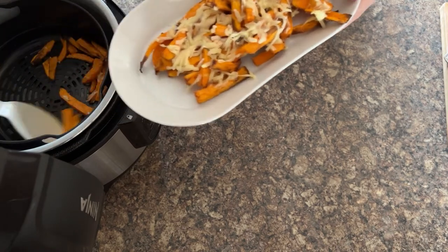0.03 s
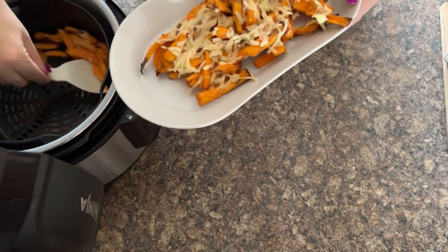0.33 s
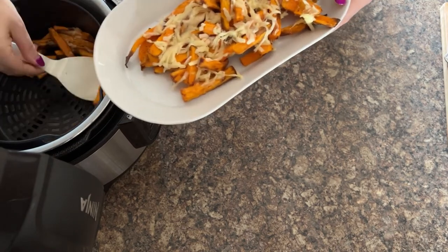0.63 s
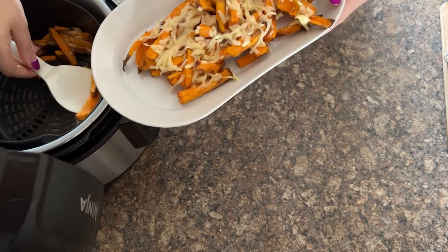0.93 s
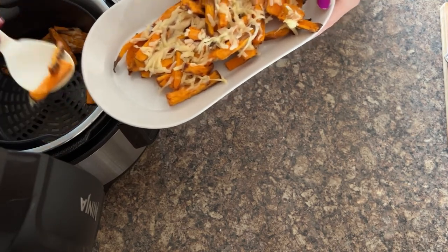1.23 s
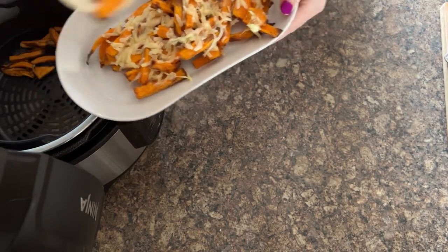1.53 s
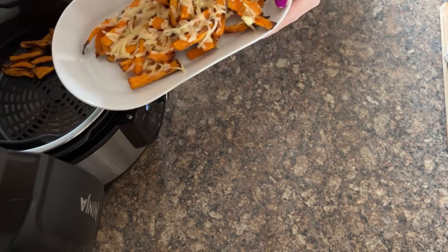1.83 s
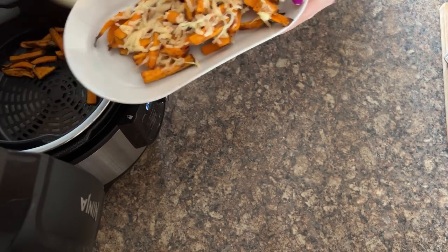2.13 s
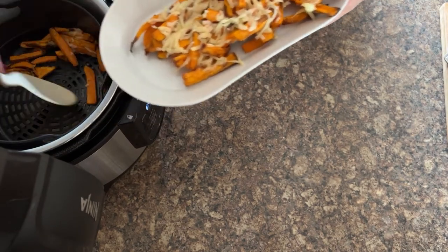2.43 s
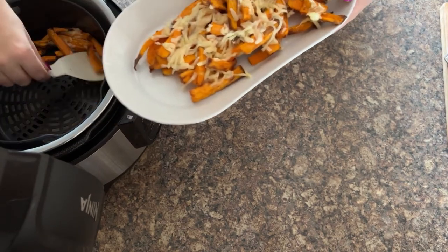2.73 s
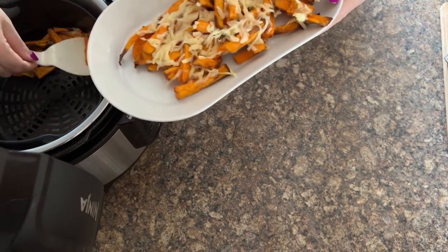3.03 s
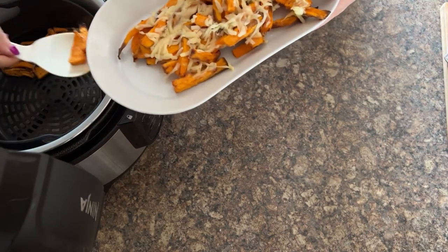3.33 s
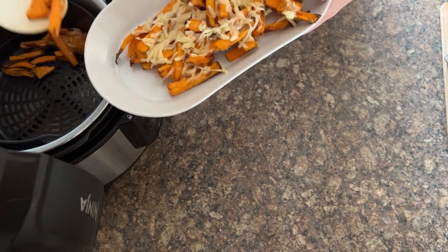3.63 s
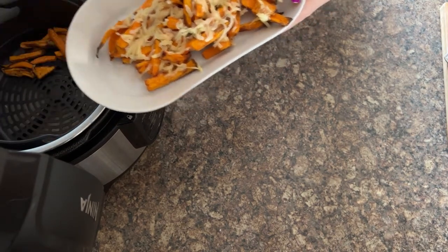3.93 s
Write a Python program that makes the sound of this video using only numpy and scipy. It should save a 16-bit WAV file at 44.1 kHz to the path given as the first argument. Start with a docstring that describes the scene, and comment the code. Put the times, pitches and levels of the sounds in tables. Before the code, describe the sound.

Plastic spoon scraping an air fryer's grate twice, with hollow bumps and fries dropping softly between.

```python
"""A plastic spoon scoops fries out of an air fryer basket in two strokes, up close in a small kitchen.
Its edge sticks and slips over the grate, catches on the slots and knocks the metal wall, while the
loose grate rocks with hollow bumps. Oily fries crackle and, between the strokes, drop softly on a
dish, which taps the fryer's rim once. An appliance hums and whirs underneath."""
import sys
import numpy as np
from scipy import signal
from scipy.fft import rfft, irfft
from scipy.io import wavfile
from scipy.ndimage import uniform_filter1d

SR = 44100
rng = np.random.default_rng(int(sys.argv[2]) if len(sys.argv) > 2 else 0)


def int16_out(signal):
    """Quantize to a 16-bit WAV file."""
    q = np.round(np.clip(np.atleast_2d(signal).T, -1, 1) * 32767)
    wavfile.write(sys.argv[1], SR, q.astype(np.int16))


N = 176400

# Stereo width of noise, side against mid: freq_hz, side_db
STEREO_WIDTH = [(40, -19), (150, -9.5), (400, -8.5), (1000, -3), (3000, -7.5), (8000, -3.5), (16000, 4.5)]
# Room tone: freq_hz, gain_db
AIR_EQ = [(22, -17), (32, -23), (45, -0.5), (78, 2.5), (120, -10), (200, -15), (260, -17.5), (400, -20),
          (630, -27), (1000, -34), (2000, -34.5), (3200, -47.5), (13000, -44.5), (16000, -57)]
# Mains hum of the appliance: pitch_hz, rms_db
HUM_PARTIALS = [(49.7, -58), (99.6, -65), (199.4, -77.5)]
# Colour of the kitchen reverb: freq_hz, gain_db
REVERB_EQ = [(60, -13.5), (300, -9), (1000, -6), (3000, -12), (8000, -10), (16000, -34)]
# Ceramic ring of the dish: pitch_hz, gain_db, t60_s
DISH_MODES = [(592.5, -7, .5), (824, -10, 0.45), (1040, -10, 0.27), (1200, -2.5, 0.087), (1310, -7, 0.44),
              (2120, -12.5, 0.23)]
# Dull tap of the dish on the rim: freq_hz, gain_db
DISH_TAP_EQ = [(200, -22), (600, -3.5), (1400, -5.5), (2500, -11.5), (5000, -10)]
# Oily fries crackle as they are lifted and tipped: time_s, level_db
CRACKLE_ENVELOPE = [(0, -86), (.7, -86), (1.0, -73), (1.35, -91.5), (1.7, -77), (2.05, -80.5), (2.3, -99),
                    (4, -99)]
# Colour of the crackle: freq_hz, gain_db
CRACKLE_EQ = [(500, -14), (2000, -2), (5000, -3.5), (9000, -6), (12000, -6), (16000, -7.5)]
# Fries drop, shift and tick: start_s, level_db, centre_hz, spread_octaves, rise_s
FRY_PATS = [(1.528, -76, 2390, 1.1, 0.00045), (1.563, -70.5, 1630, 1.05, .0005),
            (1.634, -76, 3160, 0.54, 0.015), (1.662, -70, 2470, 1.1, 0.023),
            (1.704, -56.5, 1850, 1.28, 0.000074), (1.808, -66.5, 2640, 1.03, 0.0029),
            (1.846, -67.5, 3580, .75, 0.0038), (1.924, -69, 2790, 0.73, 0.00046),
            (1.987, -67, 4030, 3, 0.0013), (1.999, -67, 1730, 1.3, 0.0049), (2.1365, -76, 3460, 1.6, .0003),
            (2.25, -75, 3200, 1.6, .0005), (2.351, -74, 2500, 1.2, 0.0053),
            (3.478, -74.5, 4500, 0.48, 0.00034), (3.9073, -74.5, 11200, 0.59, 0.00016)]
# Low modes of the basket in its housing: pitch_hz, gain_db, t60_s
BODY_MODES = [(194.6, -19, 0.12), (271, -8.5, 0.166), (322.7, -2, 0.12), (356, 1, 0.2), (437.4, 1, 0.053),
              (448, -24.5, 0.14), (510, -6.5, 0.065), (584.5, -12.5, 0.11), (625, -9, 0.057)]
# Ring of the grate in the bottom of the basket: pitch_hz, gain_db, t60_s
GRATE_MODES = [(615, -10, 0.074), (907, 1, 0.11), (1247, -13.5, 0.051), (1390, -10, 0.15),
               (1670, -1.5, 0.047), (2068, -1.5, 0.11), (2080, 2.5, 0.15), (2300, -10, 0.088),
               (2955, 1.5, 0.11), (3266, -9.5, 0.094), (3770, -8.5, 0.24), (4464, -3, .06)]
# Ring of the metal wall: pitch_hz, gain_db, t60_s
WALL_MODES = [(1011, -2.5, 0.17), (1050, -23, 0.26), (1520, -9.5, 0.36), (1551, 3, 0.1), (1872, -43, 0.51),
              (2245, -25.5, 0.19), (2499, -0.5, 0.18), (2906, 2, 0.09), (2990, 3.5, 0.17),
              (3476, 1.5, 0.12), (3716, -7, .2), (3775, -5.5, 0.12), (4255, -7.5, .25), (4730, -5.5, 0.13),
              (5650, -25, 0.59), (6360, -10.5, 0.098), (7050, -7, 0.076), (8450, -13, 0.142)]
# Hollow bumps and a rising groan of the grate: start_s, level_db, pitch_hz, glide_hz_per_s, t60_s
GRATE_BUMPS = [(0, -46.5, 336, 0, 0.11), (0.033, -46, 293, 0, 0.042), (.059, -47, 343, 0, 0.071),
               (.108, -45.5, 314.6, 5, 0.32), (0.157, -45, 328, -2, 0.076), (0.192, -48, 358, 0, 0.085),
               (0.239, -51, 375, -7, 0.42), (0.323, -49, 405, 0, 0.059), (0.343, -47, 355, 0, 0.26),
               (.5, -52.5, 308, 0, 0.072), (0.576, -56.5, 338, 3, 0.1), (.626, -42.5, 519, 0, 0.037),
               (.846, -47, 334.5, 1100, 0.17), (2.502, -37.5, 359, 0, 0.079), (2.537, -38, 378.4, -1, 0.33),
               (2.654, -51, 431, 0, 0.081), (2.679, -46.5, 328, 0, 0.062), (2.761, -52, 303, -900, 0.033),
               (2.978, -42, 524, -2, .045), (3.167, -60.5, 348, 4, 0.14)]
# Spoon knocks the basket:
# start_s, clack_db, clack_centre_hz, clack_spread_octaves, clack_t60_s, wall_db, grate_db, thump_db
SPOON_KNOCKS = [(0.6253, -45, 1390, 1.7, 0.062, -46.5, -57, -39),
                (2.5025, -55.5, 1420, 1, 0.055, -74, -52.5, -53),
                (2.9087, -39.5, 1900, 0.46, 0.027, -46, -68.5, -53),
                (2.9777, -36, 1860, 1.54, 0.069, -36, -54.5, -32),
                (2.988, -45.5, 1720, 1.1, 0.048, -50.5, -61.5, -46.5)]
# Spoon edge catches on a slot and slips: start_s, rasp_db, length_s, thump_db
SLOT_CATCHES = [(0.0198, -40.5, 0.0057, -54), (0.078, -55, .006, -62), (0.223, -55.5, 0.0059, -76),
                (0.569, -59, 0.011, -72), (0.6855, -48, 0.0083, -60.5), (0.744, -50, 0.01, -55),
                (2.536, -41.5, 0.017, -49), (2.652, -52, 0.0033, -53.5), (2.7473, -55.5, 0.0021, -58)]
# Envelopes of the two scraping strokes, one list each: time_s, hiss_db, rasp_db, judder_db
STROKE_ENVELOPES = [
    [(0, -48, -49, -48.5), (.06, -60.5, -56.5, -52), (.14, -52.5, -52.5, -52), (.19, -57, -60.5, -57),
     (.25, -49.5, -61.5, -57.5), (.33, -53, -56, -47.5), (.4, -56, -63.5, -56), (.47, -74, -71.5, -72),
     (.51, -102, -63.5, -59), (.6, -70.5, -61, -60.5), (.72, -63, -63.5, -51.5), (.79, -53, -74, -56.5),
     (.85, -67.5, -68.5, -55), (.93, -69.5, -70.5, -63), (1.2, -97, -84.5, -76)],
    [(2.495, -66, -65.5, -70), (2.505, -56, -56, -52.5), (2.57, -57.5, -61, -51.5), (2.62, -70.5, -68, -74),
     (2.64, -56, -57.5, -60.5), (2.67, -52.5, -49.5, -55), (2.69, -64, -70, -55.5),
     (2.725, -78, -90, -69.5), (2.755, -82.5, -58.5, -52), (2.83, -86, -78, -73.5), (2.89, -73, -51.5, -53),
     (2.96, -72, -58, -55.5), (3.19, -84, -77, -63.5), (3.3, -95.5, -87, -72)],
]
# Colours of the friction (bright slip, treble hiss, mid rasp, low judder): freq_hz, gain_db
SLIP_EQ = [(200, -31), (900, -15), (2400, 7.5), (4200, 4.5), (5500, 2.5), (7800, 7.5), (12500, 2.5),
           (15800, -3.5)]
HISS_EQ = [(400, -42), (2000, -7.5), (3500, -1), (5200, -3.5), (7800, 4), (9500, -7), (12000, 2.5),
           (15800, -6.5)]
RASP_EQ = [(200, -1), (580, -0.5), (720, -8), (900, -1), (1300, 7), (2200, 1.5), (3300, -1), (5000, -6),
           (12000, -25.5)]
JUDDER_EQ = [(60, -34.5), (170, -1), (240, -6), (310, -3), (410, 0.5), (520, -26.5), (800, -28.5),
             (4000, -53.5)]

GRAINS_PER_S, GRAIN_T60_S = 4900, 0.0052  # stick-slip of plastic on the grate
TIME = np.arange(N) / SR
SIDE = np.array([[1], [-1]])  # left plus, right minus


def undb(db):
    """Decibels to gain."""
    return 10 ** (np.asarray(db) / 20)


def unit(x):
    """Scale a response to unit energy, averaged over the channels."""
    return x / np.sqrt(np.mean(np.sum(x ** 2, axis=-1)))


def fade(t, t60):
    """Exponential decay, 60 dB down at t60."""
    return np.exp(-np.log(1000) * t / t60)


def envelope(table, column=1):
    """Gain along one dB column of a timed table, silent outside it."""
    rows = np.array(table, float)
    return undb(np.interp(TIME, rows[:, 0], rows[:, column], left=-200, right=-200))


def colour(x, eq):
    """Minimum-phase EQ through (freq_hz, gain_db) points."""
    size = 8192
    hz, db = np.array(eq, float).T
    bin_db = np.interp(np.log(np.fft.rfftfreq(size, 1 / SR) + 1), np.log(hz), db)
    cepstrum = irfft(np.log(undb(bin_db)))
    cepstrum[1:size // 2] *= 2
    cepstrum[size // 2 + 1:] = 0
    impulse = irfft(np.exp(rfft(cepstrum)))
    return signal.fftconvolve(x, impulse[None], axes=-1)[:, :x.shape[-1]]


def bell_eq(centre_hz, octaves, floor_db=-30):
    """EQ points of a bell standing on a flat floor."""
    hz = np.geomspace(20, SR / 2, num=240)
    bell = np.exp(-(np.log2(hz / centre_hz) / octaves) ** 2)
    return np.c_[hz, 20 * np.log10(bell + undb(floor_db))]


def noise(n):
    """Stereo noise, narrow in the bass and wide in the treble."""
    mid, side = rng.standard_normal((2, 1, n))
    hz, side_db = np.array(STEREO_WIDTH, float).T
    total_db = 10 * np.log10(1 + undb(side_db) ** 2)
    return colour(mid, np.c_[hz, -total_db]) + SIDE * colour(side, np.c_[hz, side_db - total_db])


def grains(per_s, scatter_db):
    """Random tiny impulses of uneven size, rms 1."""
    chance, size, sign = rng.random(N), rng.exponential(size=N), rng.choice([-1, 1], N)
    clicks = (chance < per_s / SR) * sign * undb(scatter_db * np.minimum(size, 4))
    return clicks / np.sqrt(np.mean(clicks ** 2))


def burst(eq, t60, rise_s=.0001):
    """Many close, quickly damped resonances: decaying noise, flattened and then coloured."""
    t = TIME[:SR // 5]
    spectrum = rfft(noise(len(t)) * fade(t, t60) * (1 - np.exp(-t / rise_s)))
    local_power = uniform_filter1d(abs(spectrum) ** 2, size=160)
    flat = irfft(spectrum / np.sqrt(local_power + 1e-12))
    return unit(colour(flat, eq))


def modes(table, pan_db=0, scatter_db=0, detune=0):
    """Ring of an object; scatter and detune stand for the point and pressure of contact."""
    t = TIME[:SR // 2]
    out = 0
    for k, (hz, db, t60) in enumerate(table):
        weight, shift = rng.standard_normal(2)
        stereo_phase = 0.18 * np.sqrt(hz / 1000) * rng.choice([-1, 1]) * SIDE
        gain = (-1) ** k * undb(db + scatter_db * weight)  # neighbours swing against each other
        tone = np.sin(2 * np.pi * hz * (1 + detune * shift) * t + stereo_phase)
        out = out + gain * fade(t, t60) * tone
    return unit(out) * undb(SIDE * pan_db / 2)


def drive(force, response):
    """Play a force through a stereo response."""
    return signal.fftconvolve(np.atleast_2d(force), response, axes=-1)[:, :N]


def add_hit(out, start_s, db, response):
    """Mix in one hit; db is the level of a unit-energy response spread over 20 ms."""
    i = max(int(start_s * SR), 0)
    out[:, i:i + response.shape[-1]] += undb(db) * np.sqrt(SR * .02) * response[:, :N - i]


def noise_bed(eq, rms_db):
    """Steady coloured noise, for room tone or whir."""
    settled = colour(noise(N + SR // 4), eq)[:, -N:]
    return undb(rms_db) * np.sqrt(N) * unit(settled)


def appliance(waver_db=2.2):
    """A narrow whir over mains hum whose partials waver slowly in level."""
    out = noise_bed(bell_eq(centre_hz=1584, octaves=.13), rms_db=-81)
    for hz, db in HUM_PARTIALS:
        waver = signal.resample(rng.standard_normal(size=24), N)
        tone = np.sin(2 * np.pi * (hz * TIME + rng.random()))
        out += np.sqrt(2) * undb(db + waver_db * waver) * tone
    return out


def kitchen(direct, low_t60_s=0.33, treble_t60_s=0.32, onset_s=0.018):
    """The small room adds a short diffuse tail that dies a touch sooner in the treble."""
    t = TIME[:SR]
    wash = noise(SR) * (1 - np.exp(-(t / onset_s) ** 2))
    low = signal.sosfilt(signal.butter(1, 1500, fs=SR, output="sos"), wash)
    tail = unit(low * fade(t, low_t60_s) + (wash - low) * fade(t, treble_t60_s))
    return direct + drive(direct, colour(tail, REVERB_EQ))


def dish_tap(start_s=2.373, ring_db=-53, tap_db=-51, ring_rise_s=0.0024, cutoff_hz=2830):
    """The dish touches the rim: a dull tap and a faint ring; the soft contact leaves out the treble."""
    out = np.zeros((2, N))
    attack = 1 - np.exp(-TIME[:SR // 2] / ring_rise_s)
    add_hit(out, start_s, ring_db, modes(DISH_MODES) * attack)
    add_hit(out, start_s, tap_db, burst(DISH_TAP_EQ, t60=0.41, rise_s=0.0019))
    return signal.sosfilt(signal.butter(2, cutoff_hz, fs=SR, output="sos"), out)


def fries():
    """Fries land and shift with soft damped pats over a faint oily crackle."""
    crackle = grains(per_s=190, scatter_db=3) * envelope(CRACKLE_ENVELOPE)
    out = drive(crackle, burst(CRACKLE_EQ, t60=0.02, rise_s=0.00051))
    for start, db, hz, octaves, rise in FRY_PATS:
        add_hit(out, start, db, burst(bell_eq(hz, octaves), t60=0.087, rise_s=rise))
    return out


def grate_bumps(rise_s=0.0022, stereo_rad=.25):
    """The loose grate rocks under the spoon with hollow notes, some of them gliding."""
    out, t = np.zeros((2, N)), TIME[:SR // 3]
    for start, db, hz, glide, t60 in GRATE_BUMPS:
        note = np.sin(2 * np.pi * (hz * t + glide * t ** 2 / 2) + stereo_rad * SIDE)
        add_hit(out, start, db, unit(note * fade(t, t60) * (1 - np.exp(-t / rise_s))))
    return out


def grate_ring(force, spots=32):
    """The grate rings differently at each spot that the spoon passes."""
    out = np.zeros((2, N + SR))
    edges = np.linspace(0, N, spots + 1).astype(int)
    for start, end in zip(edges, edges[1:]):
        if abs(force[start:end]).max() > 1e-5:
            ring = drive(force[start:end], modes(GRATE_MODES, scatter_db=10.5, detune=.025))
            out[:, start:start + ring.shape[-1]] += ring
    return out[:, :N]


def spoon_knocks(body, wall):
    """A plastic clack, the ring of wall and grate, and the thump of the whole basket."""
    out = np.zeros((2, N))
    for start, clack_db, hz, octaves, t60, wall_db, grate_db, thump_db in SPOON_KNOCKS:
        add_hit(out, start, clack_db, burst(bell_eq(hz, octaves), t60, rise_s=0.00022))
        add_hit(out, start, wall_db, wall)
        add_hit(out, start, grate_db, modes(GRATE_MODES))
        add_hit(out, start, thump_db, body)
    return out


def spoon_catches(body, grate_db=-3):
    """The edge lets go of a slot with a bright spray of grains, a ring and a small thump."""
    thumps, force = np.zeros((2, N)), np.zeros(N)
    for start, rasp_db, length, thump_db in SLOT_CATCHES:
        force += undb(rasp_db) * (TIME >= start) * np.exp(-((TIME - start) / length) ** 2 / 2)
        add_hit(thumps, start, thump_db, body)
    slip = force * grains(GRAINS_PER_S, scatter_db=3)
    return thumps + drive(slip, burst(SLIP_EQ, GRAIN_T60_S)) + undb(grate_db) * grate_ring(slip)


def spoon_scrapes(body, grit_per_s=200, grit_db=2, grate_db=-4.5, body_db=-4.5, rumble_db=-2.5):
    """Gritty clusters of stick-slip grains hiss, rasp and ring the grate; judder shakes the basket."""
    hiss, rasp, judder = (sum(envelope(stroke, column) for stroke in STROKE_ENVELOPES)
                          for column in (1, 2, 3))
    grit = undb(grit_db * np.interp(TIME * grit_per_s, np.arange(N), rng.standard_normal(N)))
    friction = grains(GRAINS_PER_S, scatter_db=1) * grit / np.sqrt(np.mean(grit ** 2))
    shake = judder * grains(per_s=260, scatter_db=0.5)
    impulse = np.eye(1, SR // 4)
    rumble = unit(colour(impulse, JUDDER_EQ))
    return (drive(friction * hiss, burst(HISS_EQ, GRAIN_T60_S))
            + drive(friction * rasp, burst(RASP_EQ, GRAIN_T60_S))
            + undb(grate_db) * grate_ring(friction * rasp)
            + undb(body_db) * drive(shake, body)
            + undb(rumble_db) * drive(shake, rumble))


def scene():
    """Spoon, basket, fries and dish in the kitchen, over room tone and hum."""
    body, wall = modes(BODY_MODES), modes(WALL_MODES, pan_db=4)
    spoon = spoon_scrapes(body) + spoon_catches(body) + spoon_knocks(body, wall)
    foley = spoon + grate_bumps() + fries() + dish_tap()
    return kitchen(foley) + noise_bed(AIR_EQ, rms_db=-61) + appliance()


def record(dry):
    """A steep low-pass trims the very top."""
    cutoff_hz = 16200
    return signal.sosfilt(signal.ellip(10, .2, 80, cutoff_hz, fs=SR, output="sos"), dry)


dry = scene()
out = record(dry)
int16_out(out)
```